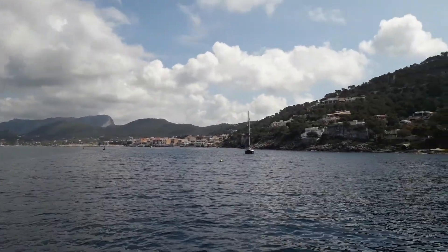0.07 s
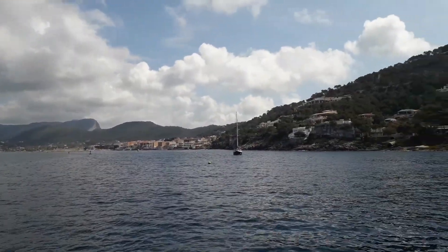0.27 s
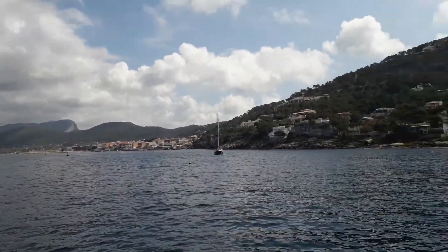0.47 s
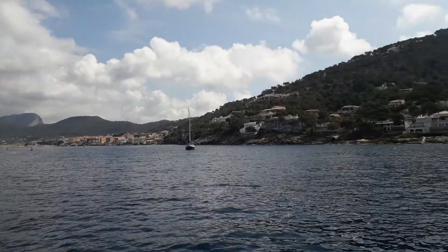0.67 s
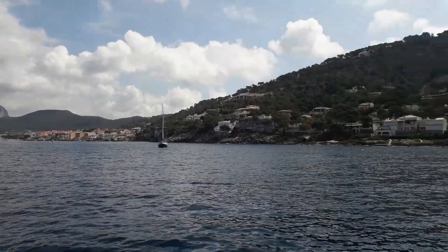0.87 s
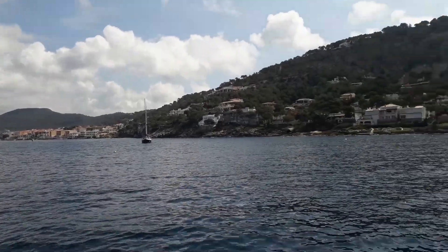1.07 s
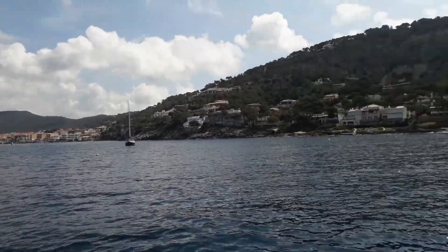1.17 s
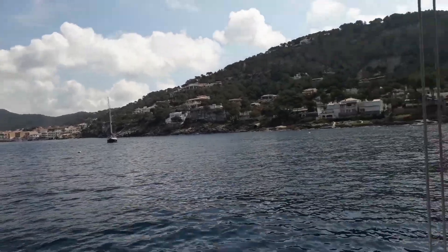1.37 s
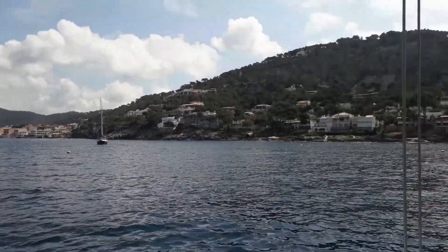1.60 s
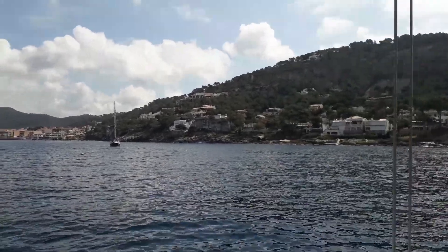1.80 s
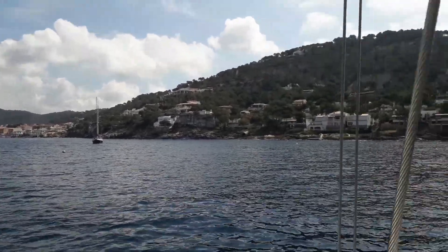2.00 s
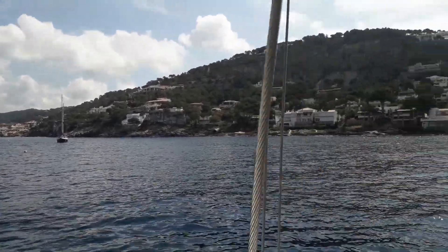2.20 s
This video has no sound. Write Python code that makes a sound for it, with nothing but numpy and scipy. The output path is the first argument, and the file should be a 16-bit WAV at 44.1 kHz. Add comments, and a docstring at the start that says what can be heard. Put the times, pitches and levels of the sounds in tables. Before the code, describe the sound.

On the deck of a sailing boat, rigging clunks and rings briefly, wires twang and a rope rasps in short pulls. Small metal clinks and dull knocks come between, over gently washing water and wind puffs on the microphone.

```python
"""Rigging on a sailing boat

On deck near shore, a heavy fitting clunks against taut rigging and excites its modes. Wire stays snap
in short falling chirps, since bending waves carry the treble fastest. A line rasps in short pulls of
stick-slip friction, a small metal piece clinks and links jingle. Dull knocks and wind buffets lie over
a soft wash of water."""
import sys
import numpy as np
from scipy import signal
from scipy.fft import rfft, irfft
from scipy.io import wavfile
from scipy.ndimage import uniform_filter1d

SR = 44100
rng = np.random.default_rng(int(sys.argv[2]) if len(sys.argv) > 2 else 0)


def transcribe(signal):
    """Save signal, clipped to [-1, 1], as a 16-bit WAV file at the path in sys.argv[1]."""
    frames = np.atleast_2d(signal).T
    limited = np.clip(frames, -1, 1)
    pcm = np.round(limited * 32767).astype(np.int16)
    wavfile.write(sys.argv[1], SR, pcm)


N = 99225

# Spectra of the sources. Each row: frequency in Hz, relative level in dB.
WATER_SPECTRUM = [(30, -26), (150, 0.5), (330, 2), (520, -0.5), (750, -3), (1300, -4.5), (2050, -3.5),
                  (2700, -12), (3700, -10.5), (4600, -20.5), (5800, -28), (7200, -46), (9500, -48.5),
                  (12000, -41), (16000, -41)]
WIND_SPECTRUM = [(20, -40), (40, -19.5), (62, -4), (85, 1.5), (140, -1), (220, -3.5), (330, -13),
                 (600, -21), (1500, -44), (16000, -88)]
LINK_SPECTRUM = [(2000, -25), (5400, 5), (6500, 1), (7400, 1), (8600, -24.5), (9400, -17), (9900, -19),
                 (10500, -11), (11200, -13), (12200, -16), (14000, -15), (16000, -22)]
TICK_SPECTRUM = [(2000, -32), (5200, 10), (7300, -10), (8800, -18), (16000, -27)]
LINE_SPECTRUM = [(100, -28.5), (300, -9.5), (650, -10.5), (900, -4.5), (1150, -6), (1500, -0.5), (2100, 0),
                 (2750, -5), (3600, -1), (4500, -8.5), (6300, -19), (8400, -41), (15000, -43)]
CHIRP_SPECTRUM = [(500, -33), (2000, -24), (3000, -6), (3900, 5.5), (5000, 2.5), (6300, 2.5), (7300, -5.5),
                  (8700, -30), (12000, -23.5), (16000, -44)]
END_FITTING_SPECTRUM = [(500, -14.5), (1800, -16.5), (3000, -15), (3550, 0.5), (3950, 0.5), (4450, -14.5),
                        (5900, -16.5), (7000, -28), (8500, -40), (16000, -46)]
CRASH_SPECTRUM = [(60, -50), (130, -21), (240, -1), (400, -5), (540, -3.5), (680, -10), (1070, -2),
                  (1290, -6), (1500, -1), (1950, 2.5), (2400, -8), (3000, -12), (3750, -7), (4300, -19),
                  (6000, -30), (9000, -56), (16000, -57)]
# Envelopes of the water and the wind. Each row: time in seconds, level in dB.
WASH_LEVELS = [(0, -47.5), (.35, -46), (.6, -44), (.8, -42.5), (.92, -47), (1.12, -44.5), (1.35, -47.5),
               (1.6, -43), (1.9, -43), (2.06, -41.5), (2.25, -46.5)]
GUST_LEVELS = [(0, -47.5), (.3, -46.5), (.58, -45), (.65, -31), (.73, -47.5), (.83, -40), (.9, -49),
               (.98, -35), (1.05, -45.5), (1.16, -40), (1.25, -43), (1.37, -47), (1.44, -37), (1.51, -48),
               (1.58, -27), (1.66, -48), (1.96, -44.5), (2.15, -54.5), (2.25, -38)]
# Dull knocks. Each row: peak time in seconds, level in dB, centre pitch in Hz, length in seconds.
KNOCK_PULSES = [(.629, -21.5, 133, 0.005), (.647, -18.5, 123, 0.0064), (0.677, -22.5, 300, 0.0042),
                (.671, -25, 126, 0.0084), (.826, -34, 208, 0.0088), (0.977, -29.5, 248, 0.0039),
                (.989, -27.5, 108, 0.0054), (1.119, -28, 131, 0.0066), (1.137, -30.5, 178, 0.0041),
                (1.426, -22.5, 190, 0.0035), (1.455, -32, 159, 0.022), (1.55, -22.5, 151, 0.0084),
                (1.5595, -17.5, 488, 0.0017), (1.562, -11.5, 310, 0.0031), (1.568, -17.5, 145, 0.0074),
                (1.582, -21.5, 168, 0.0075), (1.587, -21.5, 367, 0.0036), (1.608, -27, 106, .011),
                (1.694, -27, 135, 0.0071), (1.771, -28.5, 117, 0.0068)]
# Shifts of small links. Each row: peak time in seconds, level in dB, half-width in seconds.
LINK_SHIFTS = [(0.246, -52, 0.018), (1.672, -53.5, .008)]
# Touches of the small metal piece. Each row: start in seconds, level in dB, weights in dB of mode 1,
# of mode 2 and of modes 5 upward, time to fall 60 dB in seconds, delay until damping in seconds.
METAL_TOUCHES = [(.2209, -53.5, 14, 2, 8, 0.077, .03), (0.2316, -53, -5, 0, 0, 0.091, .065),
                 (.3486, -57, 9.5, -8, 3, 0.11, .024), (0.4764, -41, -12, -19, -5, 0.16, .034),
                 (.5098, -39.5, 0, 10, 0, 0.053, 0.034), (.5135, -49, -5, 0, 6, 0.071, 0.045),
                 (1.7092, -27, -21, -5.5, -4, 0.094, 0.019), (1.7173, -39, -12, 10, -4, .05, .02),
                 (1.996, -39, -15, -12, 3, 0.1, 0.087)]
# Modes of the small metal piece. Each row: frequency in Hz, level in dB.
METAL_MODES = [(5394, -0.5), (6190, -1), (7245, 0), (7310, -9), (7730, -11.5), (8960, -19.5), (9330, -22),
               (10480, -30), (12330, -21), (13820, -40)]
# Pulls of the line. Each row: peak time in seconds, level in dB, rise and decay in seconds,
# tilt in dB per octave.
LINE_PULLS = [(.066, -42, 0.013, 0.032, -6.5), (.18, -36.5, 0.0017, 0.0092, -8.5),
              (.207, -38.5, 0.0041, 0.018, -9.5), (.23, -33.5, .012, 0.082, -5),
              (.382, -46.5, 0.013, 0.029, -1.5), (.555, -39.5, .015, 0.02, -15),
              (.699, -33.5, .004, 0.022, -2), (0.712, -35.5, 0.0046, 0.028, -1.5),
              (.742, -42, 0.011, .018, -14), (0.788, -34.5, 0.0049, 0.024, -4),
              (0.813, -36.5, 0.0093, 0.011, -10.5), (.85, -43.5, 0.039, .03, 2),
              (1.105, -47, .01, 0.016, 0), (1.655, -36.5, 0.033, 0.067, -1.5),
              (1.817, -34, 0.014, 0.015, 2.5), (1.841, -37.5, 0.011, 0.016, 4.5),
              (1.943, -23.5, 0.0079, 0.023, 2.5), (1.975, -32.5, 0.0068, 0.018, 2),
              (2.041, -46, .005, 0.025, 2), (2.148, -49, 0.0071, 0.017, 1), (2.2, -42.5, 0.018, 0.024, -2)]
# Snaps of the wire stays. Each row: start in seconds, level in dB, tilt in dB per octave.
STAY_SNAPS = [(.3705, -47, 0), (.3755, -45.5, 1), (0.5474, -32.5, -6), (.554, -33, -9.5), (0.576, -40, -4),
              (0.6103, -27.5, -8), (.657, -53, 3), (0.6929, -37, -4), (.7002, -31.5, -1.5),
              (0.7304, -22, 0), (.7865, -38.5, -4), (.8705, -42.5, -6)]
# Contacts of the heavy fitting. Each row: start in seconds, relative level in dB.
FITTING_CONTACTS = [(0.2529, -5.5), (0.2573, 0.5), (.262, 2), (0.2807, -7.5), (0.3082, -14)]
# Modes of the taut rigging. Each row: frequency in Hz, level in dB, time to fall 60 dB in seconds.
RIGGING_MODES = [(150, -13, .25), (250, -7, .25), (285, -10, .12), (348, -10, .2), (541, -7, .1),
                 (939, -6, .13), (1107, -4, .11), (1211, -7, .16), (1312, -8, .2), (1456, -2, .1),
                 (1683, 2, .15), (1784, -2, .19), (1892, -2, .14), (2045, -1, .2), (3677, -4, .12),
                 (3815, -7, .12)]


def undb(db):
    """Amplitude ratio of a level in decibels."""
    return 10 ** (np.asarray(db) / 20)


def gains(spectrum, hz):
    """Gains of a spectrum, interpolated on a logarithmic frequency axis."""
    frequencies, db = np.array(spectrum, float).T
    return undb(np.interp(np.log(hz + 1), np.log(frequencies), db))


def colour(x, spectrum, tilt_db=0):
    """Filtering by a spectrum and a tilt per octave, scaled to unit rms."""
    hz = np.arange(len(x) // 2 + 1) * SR / len(x)
    octaves = np.log2(np.clip(hz, 700, 8000) / 2000)
    shaped = irfft(rfft(x) * gains(spectrum, hz) * undb(tilt_db * octaves), len(x))
    return shaped / shaped.std()


def noise(spectrum, size=N, tilt_db=0):
    """Coloured Gaussian noise of unit rms."""
    return colour(rng.standard_normal(size), spectrum, tilt_db)


def flicker(rate_hz):
    """Slow modulation: random steps smoothed by two moving averages."""
    hold = int(SR / rate_hz)
    steps = np.repeat(rng.standard_normal(200), hold)[:N]
    return 1.3 * uniform_filter1d(uniform_filter1d(steps, hold), hold)


def envelope(levels):
    """Gain over time, interpolated in decibels."""
    return undb(np.interp(seconds(N), *np.array(levels).T))


def add(out, start, x):
    """Superposition of a sound from a start time in seconds."""
    i = int(round(start * SR))
    x = x[max(-i, 0):N - i]
    out[max(i, 0):max(i, 0) + len(x)] += x


def seconds(size):
    """Time axis of a given number of samples."""
    return np.arange(size) / SR


def water():
    """Ripples along the hull sum to noise: four bands flicker independently under a steady hiss."""
    rest, bands = noise(WATER_SPECTRUM), np.zeros(N)
    flicker_db = 0.67
    for edge_hz in (600, 1400, 3000, 7000):
        band = signal.sosfiltfilt(signal.butter(3, edge_hz, fs=SR, output="sos"), rest)
        bands += band * undb(flicker_db * flicker(rate_hz=40))
        rest = rest - band
    return bands * envelope(WASH_LEVELS) + rest * undb(-42.5)


def wind():
    """Pressure fluctuations of wind on the microphone make low, fluttering buffets."""
    flutter = undb(1.5 * flicker(rate_hz=30))
    return noise(WIND_SPECTRUM) * envelope(GUST_LEVELS) * flutter


def knocks():
    """Soft impacts give low pulses of a cycle or two; the pitch falls as the contact softens."""
    out, t = np.zeros(N), seconds(8192)
    middle, pitch_sag = t.mean(), 0.24
    for peak, db, hz, length in KNOCK_PULSES:
        progress = (t - middle) / length
        cycles = np.cumsum(hz * (1 - pitch_sag * np.tanh(progress))) / SR
        tone = np.cos(2 * np.pi * (cycles - cycles[len(t) // 2]))
        add(out, peak - middle, undb(db) * tone / np.cosh(1.98 * progress))
    return out


def link_jingles():
    """Small links shift against each other; their collisions merge into brief, shimmering noise."""
    t, hold = seconds(N), 64
    hiss = noise(LINK_SPECTRUM)
    shimmer = undb(3 * np.repeat(rng.standard_normal(N // hold + 1), hold)[:N])
    swells = sum(undb(db) * np.exp(-((t - peak) / width) ** 2) for peak, db, width in LINK_SHIFTS)
    return hiss * shimmer * swells


def metal_clinks():
    """A struck metal piece rings until a touch damps it; the point of contact weights its modes."""
    out, t = np.zeros(N), seconds(8192)
    contact_s, damping_s, tick_s, tick_db = 0.0003, 0.004, 0.001, 2
    onset = 1 - np.exp(-(t / contact_s) ** 2)
    for start, db, first_db, second_db, top_db, t60, free_s in METAL_TOUCHES:
        weights_db = [first_db, second_db, 0, 0] + [top_db] * (len(METAL_MODES) - 4)
        ring = np.zeros(len(t))
        for (hz, mode_db), weight_db in zip(METAL_MODES, weights_db):
            detuned_hz = hz * (1 + 0.0014 * rng.standard_normal())
            ring += undb(mode_db + weight_db) * np.sin(2 * np.pi * (detuned_hz * t + rng.random()))
        ring *= np.exp(-np.log(1000) * t / t60 - np.maximum(t - free_s, 0) / damping_s)
        tick = noise(TICK_SPECTRUM, len(t)) * np.exp(-t / tick_s)
        add(out, start, undb(db) * onset * (ring + undb(tick_db) * tick))
    return out


def line_rasps():
    """Stick-slip friction: a line moves in dense tiny jerks, and each pull swells and dies away."""
    out, t = np.zeros(N), seconds(16384)
    slips_per_s, spread_db, hiss_gain, lead_s = 4000, 3.5, 0.73, 0.1
    for peak, db, rise, decay, tilt_db in LINE_PULLS:
        slips = (rng.random(len(t)) < slips_per_s / SR) * rng.standard_normal(len(t))
        slips *= undb(spread_db * rng.standard_normal(len(t)))
        friction = slips / slips.std() + hiss_gain * rng.standard_normal(len(t))
        rasp = colour(friction, LINE_SPECTRUM, tilt_db)  # a brighter tilt stands for a faster pull
        swell = np.exp(-(np.minimum(t - lead_s, 0) / rise) ** 2 - np.maximum(t - lead_s, 0) / decay)
        add(out, peak - lead_s, undb(db) * swell * rasp)
    return out


def stay_snaps():
    """Dispersion of bending waves in a wire gives a falling chirp; it reflects, and the end rings."""
    out, t = np.zeros(N), seconds(8192)
    lag_s = 0.0062  # 4 kHz arrives this much later than 12 kHz
    echo_s, echo_db, tail_s, tail_db = 0.0071, -3, 0.01, -7.5
    scatter, scatter_s = 0.9, 0.0013  # the strands of the wire smear each wave
    hz = np.arange(len(t) // 2 + 1) * SR / len(t)
    octaves = np.log2(np.clip(hz, 2000, 12000) / 4000)
    slowness = (np.sqrt(12000 / np.maximum(hz, 300)) - 1) / (np.sqrt(3) - 1)
    group_delay = 0.00094 + lag_s * slowness
    travel = np.exp(-2j * np.pi * np.cumsum(group_delay) * hz[1])
    chirp = irfft(gains(CHIRP_SPECTRUM, hz) * travel)
    echo = np.roll(irfft(gains(END_FITTING_SPECTRUM, hz) * travel), int(echo_s * SR))
    wave = chirp / abs(chirp).max() + undb(echo_db) * echo / abs(echo).max()
    swell = (t / tail_s * np.exp(1 - t / tail_s)) ** 2
    for start, db, tilt_db in STAY_SNAPS:
        strands = rng.standard_normal(len(t)) * np.exp(-t / scatter_s)
        smear = (1 + scatter * rfft(strands) / np.linalg.norm(strands)) / np.hypot(1, scatter)
        tail = undb(tail_db) * swell * noise(END_FITTING_SPECTRUM, len(t))
        spectrum = (rfft(wave) * smear + rfft(tail)) * undb(tilt_db * octaves)
        add(out, start, undb(db) * irfft(spectrum))
    return out


def fitting_clunk():
    """Quick impacts of a heavy fitting excite the rigging's modes; dense, short ones merge as a crash."""
    out, t = np.zeros(N), seconds(16384)
    ring_db, crash_db, tail_db = -30.5, -19, -14.5
    contact_s, crash_s, tail_s = 0.00034, 0.011, 0.058
    onset = 1 - np.exp(-t / contact_s)
    for start, db in FITTING_CONTACTS:
        ring = np.zeros(len(t))
        for hz, mode_db, t60 in RIGGING_MODES:
            decay = np.exp(-np.log(1000) * t / t60)
            ring += undb(mode_db) * np.sin(2 * np.pi * (hz * t + rng.random())) * decay
        crash = noise(CRASH_SPECTRUM, len(t)) * np.exp(-t / crash_s)
        dull_tail = noise(CRASH_SPECTRUM, len(t), tilt_db=-8) * np.exp(-t / tail_s)
        crash += undb(tail_db) * dull_tail
        add(out, start, undb(db) * onset * (undb(ring_db) * ring + undb(crash_db) * crash))
    return out


def scene():
    """The pressures of rigging, knocks, wind and water add in one channel."""
    rigging = metal_clinks() + link_jingles() + stay_snaps() + fitting_clunk() + line_rasps()
    return (rigging + knocks() + wind() + water())[None]


def record(dry):
    """Band limiting: a steep elliptic low-pass removes the highest treble."""
    cutoff_hz = 16000
    return signal.sosfilt(signal.ellip(8, 0.2, 70, cutoff_hz, fs=SR, output="sos"), dry)


dry = scene()
out = record(dry)
transcribe(out)
```